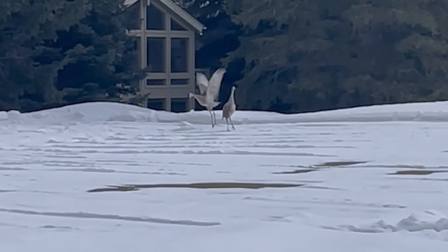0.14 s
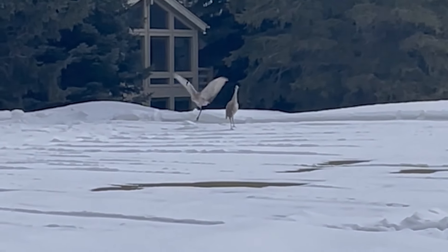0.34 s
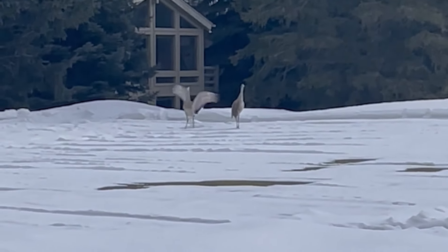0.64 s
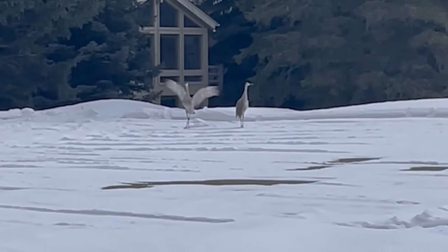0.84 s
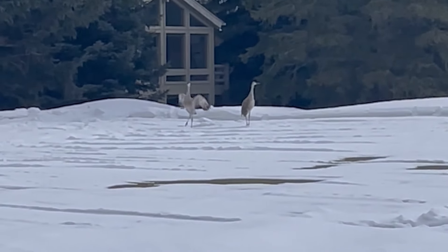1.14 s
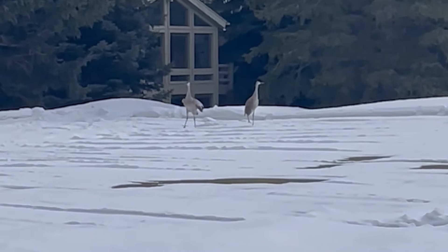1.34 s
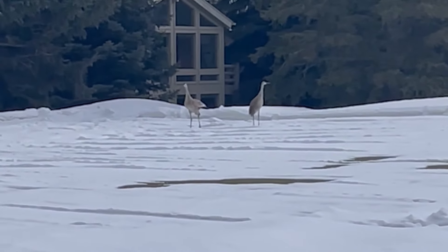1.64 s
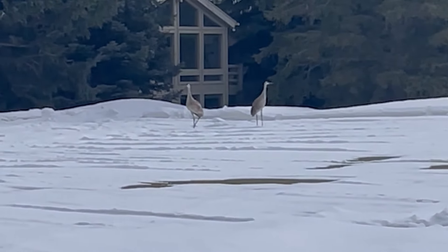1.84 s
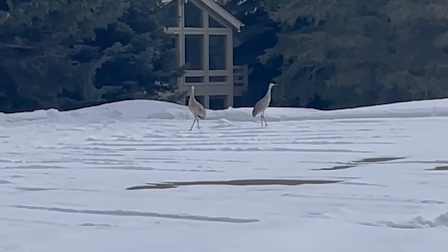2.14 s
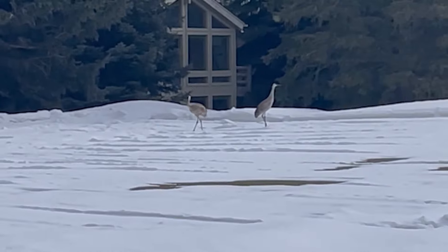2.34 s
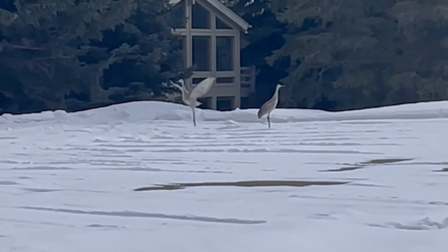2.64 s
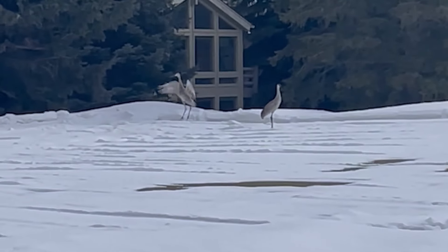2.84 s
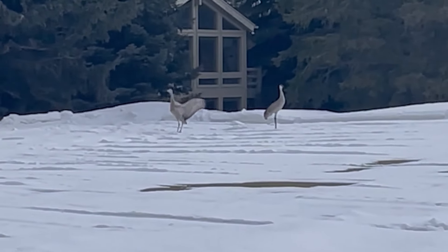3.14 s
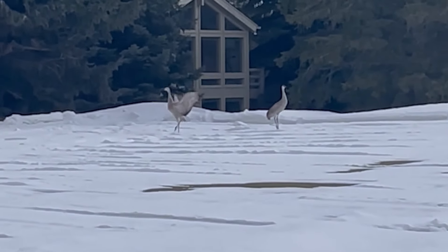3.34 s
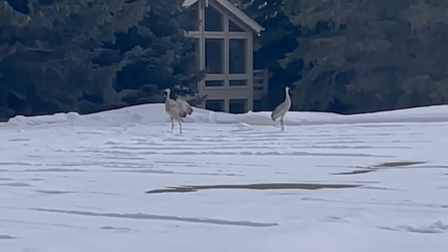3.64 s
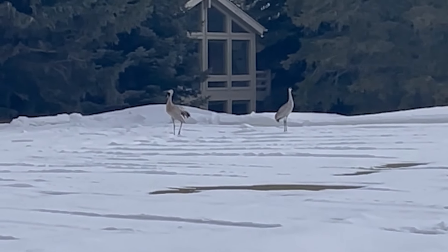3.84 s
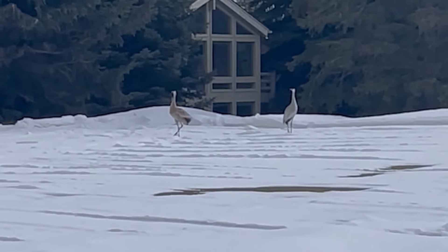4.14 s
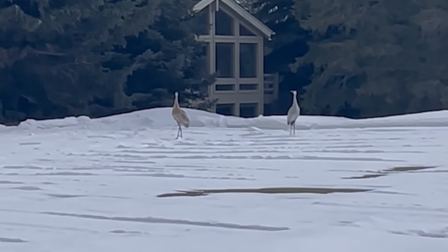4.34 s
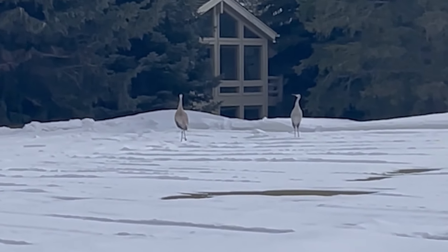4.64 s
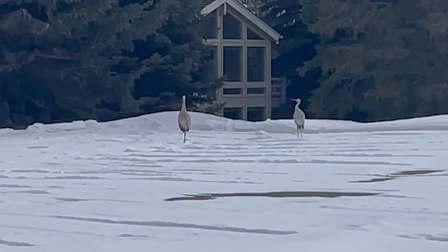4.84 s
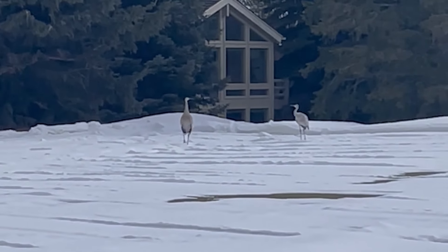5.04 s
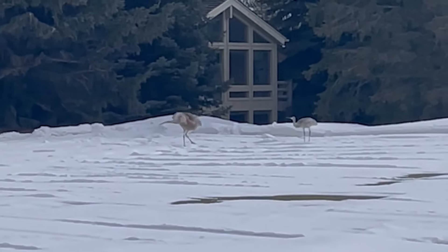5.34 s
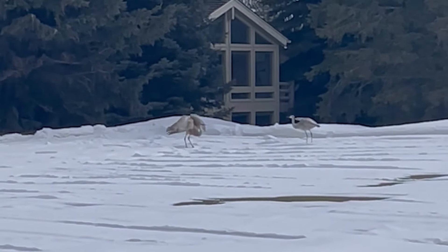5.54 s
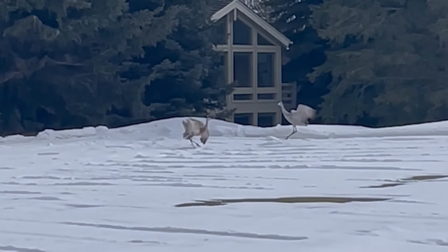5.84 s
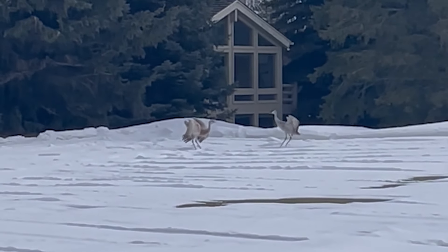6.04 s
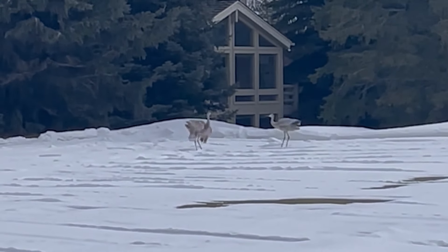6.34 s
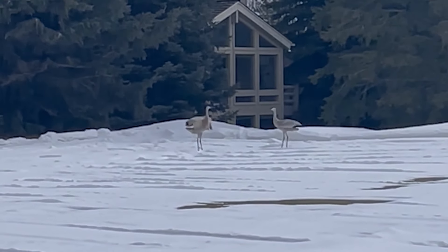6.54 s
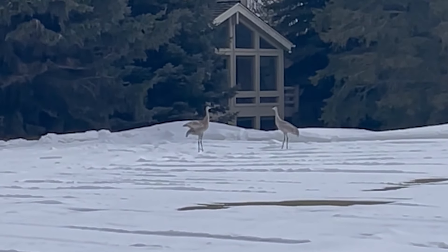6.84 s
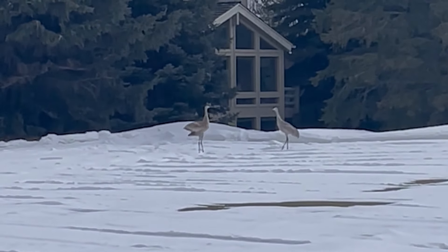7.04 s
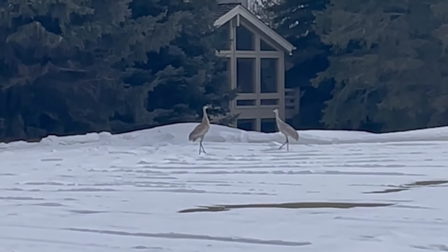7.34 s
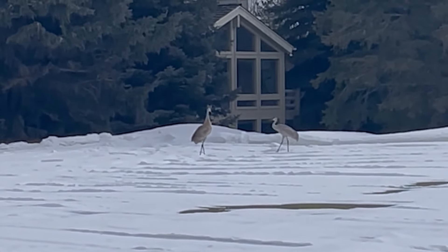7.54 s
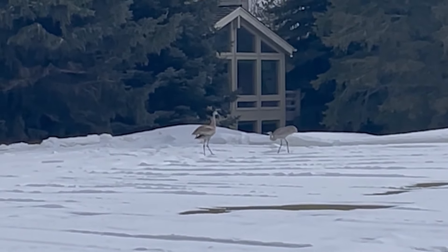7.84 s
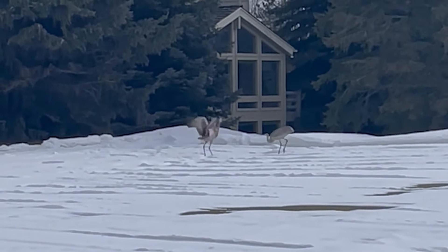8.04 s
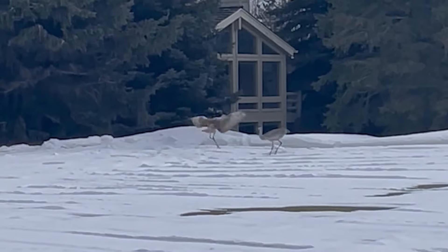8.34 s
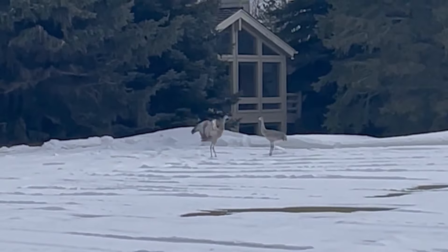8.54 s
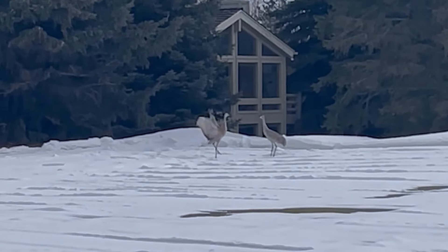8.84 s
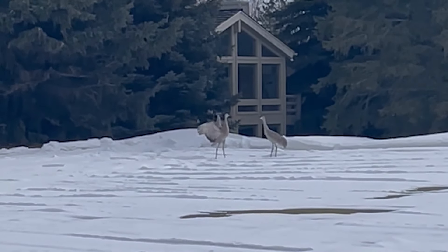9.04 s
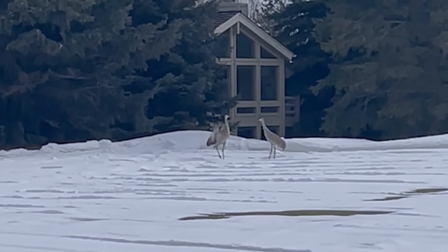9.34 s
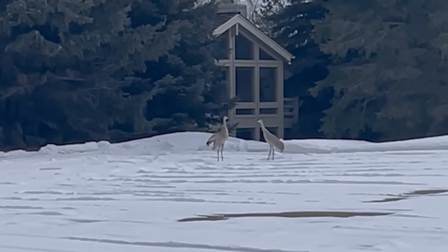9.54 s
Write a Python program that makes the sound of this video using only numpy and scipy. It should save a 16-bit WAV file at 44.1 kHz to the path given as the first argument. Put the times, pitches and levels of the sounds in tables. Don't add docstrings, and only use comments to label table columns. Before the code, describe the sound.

A wide, quiet snowy field with soft far road hiss and low rumble throughout. At 0 s a crane duet is already rattling, a higher clean voice over a lower, rougher one, ending by 0.4 s with an echo from the house and trees. Tiny gliding bird notes appear near 1.5 and 2.7 s, with a soft thud at 2.35. A short toot at 2.8 opens the second, loudest duet, rolling to 3.6 s. A low idling hum swells around 3.5 to 4, and a far engine revs up, pulling away until 4.9. A thud lands at 4.8; faint steady chips run from 4.9 to about 8.5. The engine drones from 5 s to the end. The third duet runs 5.6 to 6.4, with dull thuds at 5.6, 6.2 and 6.9. Faint falling peeps come from 6.8 to 7.8. The last, slightly softer duet rattles from 8.4 to 9.1, then its tail fades into road and drone.

```python
import sys
import numpy as np
from scipy import signal
from scipy.fft import rfft, irfft, next_fast_len
from scipy.io import wavfile
from scipy.ndimage import uniform_filter1d

SR = 44100
rng = np.random.default_rng(int(sys.argv[2]) if len(sys.argv) > 2 else 0)


def volts(x):
    e = np.asarray(x, float) / 20
    return 10 ** e


def int16_out(signal):
    q = np.round(np.clip(np.atleast_2d(signal).T, -1, 1) * 32767)
    wavfile.write(sys.argv[1], SR, q.astype(np.int16))


N = 427759
TIME = np.arange(N) / SR

# time in seconds, hiss level in dB.
ROAD_HISS = [(0.0, -56), (1.1, -58.5), (2.4, -58), (2.9, -55.5), (3.6, -57), (4.1, -54.5), (4.9, -57.5),
             (5.7, -55.5), (6.4, -54.5), (7.2, -57.5), (7.7, -55), (8.9, -55), (9.7, -57)]
# frequency in Hz, level in dB per Hz.
ROAD_TONE = [(15, -51), (25, 6), (79, 0), (134, -9), (473, -10.5), (539, -11.5), (887, -6), (1420, -15.5),
             (2000, -24.5), (3050, -30.5), (5870, -49.5), (6690, -51.5), (7240, -49), (10200, -58),
             (12000, -61), (12600, -83)]
# frequency in Hz, side level minus middle level in dB.
ROAD_SIDE = [(60, -33), (110, -33), (200, -14.5), (360, -14.5), (650, -12.5), (1180, -11), (2140, -10.5),
             (3880, -12), (7050, -10), (12800, -1)]
# time in seconds, hum level in dB.
IDLER_HUM = [(0, -59.5), (1.1, -63), (1.5, -55.5), (2.3, -54.5), (2.95, -51.5), (3.2, -49), (3.5, -43.5),
             (3.7, -49), (3.83, -43), (4.0, -50), (4.6, -61), (5.7, -60), (7, -62), (7.4, -61.5),
             (9.7, -72)]

# time in seconds, peak level in dB, pitch in Hz.
HIGH_HONKS = [(0.012, -17.5, 999), (0.062, -18.5, 984), (0.11, -19.5, 969), (0.156, -25, 848),
              (2.939, -17, 967), (3.006, -16.5, 1000), (3.065, -16, 1016), (3.114, -17, 974),
              (3.164, -16.5, 981), (3.209, -19, 948), (3.255, -20.5, 839), (5.775, -19, 983),
              (5.843, -18.5, 1007), (5.902, -17.5, 975), (5.951, -17.5, 1000), (6.002, -17.5, 970),
              (6.053, -18.5, 964), (6.101, -22, 985), (8.551, -20.5, 969), (8.617, -21, 996),
              (8.673, -20, 932), (8.727, -18.5, 992), (8.778, -24, 975), (8.826, -21.5, 976),
              (8.869, -23.5, 910)]
# time in seconds,
# peak level in dB, pitch in Hz.
LOW_HONKS = [(0.024, -23, 827), (0.083, -21, 806), (0.146, -26, 806), (0.201, -25, 744), (0.256, -24, 760),
             (0.302, -24.5, 699), (3.109, -20.5, 763), (3.189, -23, 753), (3.267, -31, 800),
             (3.321, -23, 746), (3.377, -24, 773), (3.426, -21.5, 743), (3.475, -23.5, 663.4),
             (5.885, -39, 660), (5.92, -23, 749), (5.997, -22.5, 769), (6.069, -21, 745),
             (6.13, -22.5, 777), (6.187, -23.5, 757), (6.242, -23.5, 747), (6.293, -25.5, 763),
             (8.66, -32, 840), (8.704, -21, 761), (8.78, -20.5, 748), (8.848, -21.5, 776),
             (8.909, -23.5, 752), (8.966, -25, 738), (9.016, -26, 769),
             (0.347, -34, 661),
    (3.515, -26, 742),
    (3.555, -33, 667),
    (6.336, -29, 750),
    (6.376, -34.5, 707),
    (9.057, -26.5, 728),
]
# frequency in Hz, level in dB.
HIGH_THROAT = [(550, -17), (780, -0.5), (1020, 0), (1400, -12.5), (2050, -9.5), (2500, -24.5), (3100, -18),
               (4300, -19.5), (5300, -25), (6600, -24.5), (8400, -30.5), (9800, -38.5), (12100, -37.5),
               (13800, -62)]
# frequency in Hz, level in dB.
LOW_THROAT = [(430, -13), (600, -0.5), (780, -0.5), (1050, 5.5), (1300, -8), (1850, -3), (2400, -15),
              (3000, -11.5), (4600, -19), (5600, -23), (8070, -28), (9700, -41), (11500, -40), (13800, -62)]
HIGH_BRIGHT_DB = [-3, 0.16, -2.27, -3]
LOW_BRIGHT_DB = [2.2, 0.14, 0.41, 0.13]
# start in seconds, end in seconds,
# frequency cancelled by the bounce off the snow in Hz, depth of that from 0 to 1, house echo in dB.
DUETS = [
    (0, 2.2, 3670, 0.5, -10.5),
    (2.6, 4.1, 3270, 0.91, -7.5),
    (5.5, 6.9, 3830, 0.24, -13.5),
    (8.3, 9.6, 3660, 0.65, -13.5),
]

# start in seconds, length in seconds, from Hz, to Hz, level in dB.
SLIDES = [
    (1.53, 0.056, 5900, 4400, -71),
    (1.572, .043, 4350, 4850, -72),
    (1.64, .03, 5500, 4400, -72),
    (2.653, 0.063, 5400, 4250, -73),
    (2.715, .025, 4700, 5500, -75),
    (2.752, .058, 5800, 3800, -75),
]
# time in seconds, peak level in dB, pitch in Hz.
KNOCKS = [
    (2.351, -44, 64.6),
    (4.782, -36.5, 72.7),
    (5.6, -53, 61.7),
    (6.2, -39, 66),
    (6.93, -42, 63),
]
# start in seconds, length in seconds, pitch in Hz, level in dB.
TOOTS = [
    (2.81, .052, 612, -36),
    (5.635, 0.053, 655, -34),
    (5.8, 0.041, 561, -32.5),
    (8.42, 0.045, 624, -39.5),
]
# start in seconds, length in seconds, pitch in Hz, level in dB.
CROAKS = [
    (2.98, 0.029, 530, -44.5),
    (3.012, 0.016, 587, -29.5),
    (8.58, .019, 520, -39.5),
    (8.6, 0.026, 571, -33),
]
# frequency in Hz, level in dB.
TOOT_THROAT = [(290, -42), (500, -14), (839, -12.5), (1320, 0), (1590, -8), (1780, -5), (1980, -3.5),
               (2460, -20), (3330, -12.5), (6310, -40), (7740, -37), (9630, -55), (13000, -78)]
# time in seconds, firing rate in Hz, level in dB, exhaust facing us in dB.
ENGINE = [
    [(3.7, 58, -70, -28), (3.856, 70, -56.5, 0), (4.064, 107, -47.5, -1.5), (4.3, 108, -57, -3.5),
     (4.55, 102, -57, -9), (4.9, 100, -72, 1)],
    [(5.0, 100.2, -76, 11), (5.3, 100.2, -59.5, 1), (5.8, 101, -58.5, 0.5), (6.3, 101.5, -50.5, -2.5),
     (6.76, 101.6, -53.5, -2.5), (7.05, 101.5, -59, -14), (7.4, 101.5, -60, 5.5), (7.8, 101.9, -53, -1),
     (8.1, 102.3, -53, 0.5), (8.4, 103.5, -53.5, 8.5), (9.08, 106.8, -50, -1), (9.7, 107.3, -56, 2)],
]
# time in seconds, peak level in dB, pitch in Hz.
PEEPS = [
    (6.8379, -70, 3740),
    (6.924, -64, 3500),
    (7.165, -67, 3700),
    (7.2534, -63, 3780),
    (7.4748, -63, 3730),
    (7.6002, -79, 3730),
    (7.7069, -67, 3810),
    (7.8235, -74, 3870),
]

# frequency in Hz, lead of the left in radians.
PORT_PHASE = [(100, 0), (1200, -.2), (2600, .7), (4400, .7), (5200, .1), (6900, 2.6), (12900, 8.1)]
# frequency in Hz, left minus right in dB.
PORT_DB = [(110, 0), (200, .4), (360, .9), (650, 1.8), (1180, 1), (2140, .4), (3880, 0)]


def on_log(table, hz):
    f, v = np.transpose(table)
    return np.interp(np.log(np.maximum(hz, 1)), np.log(np.maximum(f, 1)), v)


def shaped(x, gain):
    size = next_fast_len(x.shape[-1] + 4096)
    hz = np.arange(size // 2 + 1) * SR / size
    return irfft(rfft(x, size) * gain(hz), size)[..., :x.shape[-1]]


def unit(x):
    return x / np.sqrt(np.mean(x ** 2))


def walk(rate, size=N):
    k = max(int(SR / rate), 1)
    steps = np.repeat(rng.standard_normal(size // k + 1), k)
    return 1.342 * uniform_filter1d(uniform_filter1d(steps, k), k)[:size]


def add(out, s, sound):
    i = max(int(s * SR), 0)
    out[i:i + len(sound)] += sound[:N - i]


def phase(hz):
    return 2 * np.pi * np.cumsum(hz) / SR


def ports(x):
    half = lambda f: volts(on_log(PORT_DB, f) / 2) * np.exp(.5j * on_log(PORT_PHASE, f))
    return np.array([shaped(x, half), shaped(x, lambda f: 1 / half(f))])


def road():
    hiss_db = np.interp(TIME, *np.transpose(ROAD_HISS))
    hum_db = np.interp(TIME, *np.transpose(IDLER_HUM))
    rumble_db = -56 + .25 * (hum_db - hum_db.mean()) + 1.3 * walk(2.66)
    noise = 0
    for hz in 40 * 2 ** np.arange(9):
        octave = lambda f: np.cos(np.pi / 2 * np.clip(np.log2((f + 1) / hz), -1, 1))
        band = lambda f: volts(on_log(ROAD_TONE, f)) * octave(f)
        if hz < 100:
            db = rumble_db + 24
        else:
            db = (hiss_db + 58) * min(400 / hz, 1) ** .5 - 28.5
        noise = noise + volts(db + 0.41 * walk(5)) * shaped(rng.standard_normal((2, N)), band)
    side = shaped(noise[1], lambda f: volts(on_log(ROAD_SIDE, f) - 3.0))
    hum = volts(hum_db + 3.5 + 2.1 * walk(7)) * np.sin(phase(63 * (1 + 0.03 * walk(3))))
    return ports(noise[0]) + side * np.array([[1], [-1]]) + hum


def voice(hz, throat, rough, tilt_db, breath_db=-60, effort=1, bite=0, body=1):
    size = len(hz)
    hz = hz * (1 + 0.21 * rough * walk(700, size))
    turn = phase(hz)
    colour = lambda f: volts(on_log(throat, f) + tilt_db * np.log2(np.maximum(f, 300) / hz.mean()))
    lag_s, shift = 0.000517 + 0.000432 * rng.random(), rng.random()
    ripple = lambda f: 1 + 2.1 * np.cos(2 * np.pi * (f * lag_s + shift))
    hiss = lambda f: colour(f) * ripple(f) / np.hypot(1, (1500 / (f + 1)) ** 2)
    air = shaped(rng.standard_normal(size), hiss)
    out = volts(breath_db) * air * effort ** (0.61 + 2 * bite)
    for k in range(1, int(15000 / hz.mean())):
        shake = 1 + rough * min(0.51 * k - .35, 4) * walk(1200, size)
        shake = shake / np.hypot(1, rough * min(0.2 * k - .35, 4))
        strength = body if k == 1 else effort ** (1 + bite * min(k - 1, 5))
        out = out + colour(k * hz) * shake * strength * np.sin(k * turn + k * k)
    return out


def rattle(honks, bright_db, last_s, shorten, throat, sag, rough, breath_db, rise, fall, tail_db, turn_at,
           lead_db, bite, swell_at):
    out = np.zeros(N)
    times = np.array(honks)[:, 0]
    duets = np.searchsorted(np.array(DUETS)[:, 0], times) - 1
    for (s, db, hz), duet in zip(honks, duets):
        length = last_s + shorten * (times[duets == duet].max() - s)
        u = np.arange(-.3, 1.3, 1 / (SR * np.clip(length, .008, .05)))
        along = np.clip(u, 0, 1)
        head = np.sin(np.pi / 2 * np.clip(u / rise, 0, 1))
        head = head * np.exp(-(np.maximum(u - rise, 0) / fall) ** 2)
        tail = volts(tail_db + 2.0 * rng.standard_normal()) * np.exp(-((u - turn_at) / .25) ** 4)
        lead = volts(lead_db + .8 * rng.standard_normal()) * np.exp(-((u + 0.22) / 0.063) ** 4)
        swell = np.exp(-np.abs((u - swell_at) / np.where(u < swell_at, .17, .3)) ** 2.0)
        body = 0.82 * swell + volts(-4.5) * (tail + lead)
        honk = voice(hz * (1.03 - sag * along), throat, rough * (0.51 + along), bright_db[duet], breath_db,
                     head + tail + lead, bite, body)
        peak = np.sqrt(np.max(uniform_filter1d(honk ** 2, size=150)) * 2)
        add(out, s - .3 * length, volts(db) * honk / peak)
    return out


def high_rattle():
    return rattle(HIGH_HONKS, HIGH_BRIGHT_DB, .0205, .002, HIGH_THROAT, sag=0.117, rough=0.22, breath_db=9.0,
                  rise=0.14, fall=0.5, tail_db=-13.5, turn_at=0.95, lead_db=-12, bite=0.22, swell_at=0.26)


def low_rattle():
    return rattle(LOW_HONKS, LOW_BRIGHT_DB, .0165, .0161, LOW_THROAT, sag=0.1692, rough=0.295,
                  breath_db=10.0, rise=0.088, fall=.33, tail_db=-5.5, turn_at=0.72, lead_db=-20, bite=.3,
                  swell_at=0.19)


def snow_and_house(x, db):
    out = np.zeros(N)
    delay_s = .108
    for start, end, hz, depth, echo_db in DUETS:
        bays = lambda f: 1 + 0.49 * np.exp(-((f - 3150) / 400) ** 2)
        surface = lambda f: bays(f) * f / np.hypot(f, 700) / np.hypot(1, (f / 4000) ** 2)
        slap = lambda f: volts(db + echo_db) * surface(f) * np.exp(-2j * np.pi * f * delay_s)
        snow = lambda f: 1 - min(depth, 1) * np.exp(-((f - hz) / 450) ** 2)
        part = x[int(start * SR):int(end * SR)]
        add(out, start, shaped(part, lambda f: snow(f) + slap(f)))
    return out


def trees(x):
    t = np.arange(SR) / SR
    noise = rng.standard_normal((2, SR))
    noise = noise[0] + 0.31 * noise[1] * np.array([[1], [-1]])
    noise = shaped(noise, lambda f: f / np.hypot(f, 800))
    dull = shaped(noise, lambda f: 1 / np.hypot(1, (f / 2500) ** 3)) * volts(-60 * t / 1)
    bright = volts(11) * shaped(noise, lambda f: 1 / np.hypot(1, (f / 5000) ** 5)) * volts(-60 * t / 0.8)
    airy = volts(14) * shaped(noise, lambda f: np.exp(-((f - 10300) / 1700) ** 2)) * volts(-60 * t / 0.48)
    scatter = (dull + bright + airy) * np.clip(t / 0.047, .05, 1)
    scatter = scatter / np.sqrt(np.sum(scatter[0] ** 2))
    return ports(x) + volts(-19) * signal.fftconvolve(x[None], scatter, axes=1)[:, :N]


def whistle(hz, db):
    return volts(db + 2.3 * walk(120, len(hz))) * np.sqrt(2) * np.sin(phase(hz))


def slides():
    out = np.zeros(N)
    for s, length, from_hz, to_hz, db in SLIDES:
        u = np.arange(0, 1, 1 / (SR * length))
        glide = to_hz + (from_hz - to_hz) * (1 - u) ** 1.3
        glide = glide * (1 + 0.013 * walk(290, len(u)))
        note = whistle(glide, db - 4 + 3 * walk(200, len(u)))
        add(out, s, note * np.sin(np.pi * u) ** .6)
    return out


def knocks():
    out, t = np.zeros(N), np.arange(0, .15, 1 / SR)
    for s, db, hz in KNOCKS:
        turn = phase(hz + 420 * np.exp(-t / 0.0034))
        add(out, s, volts(db) * np.sin(turn) * np.clip(t / 0.00089, 0, 1) ** 2 * np.exp(-t / 0.028))
    return out


def toots(rows, rough):
    out = np.zeros(N)
    peak_at = 0.88
    for s, length, hz, db in rows:
        u = np.arange(0, 1, 1 / (SR * length))
        swell_db = -7 * np.clip(1 - u / peak_at, 0, 1)
        drop_db = -11 * np.clip((u - peak_at) / (1 - peak_at), 0, 1)
        edge = np.clip(np.minimum(u / .27, (1 - u) * length / 0.0052), 0, 1)
        scoop = 1 - .11 * np.exp(-u / .187)
        call = unit(voice(hz * scoop, TOOT_THROAT, rough, tilt_db=0.5))
        add(out, s, edge * volts(db + swell_db + drop_db) * call)
    return out


def engine(hz, db, facing_db, upper_db):
    size = len(hz)
    turn = phase(hz * (1 + 0.0031 * walk(12, size)))
    fourth_db = db - 6 + upper_db + 0.28 * facing_db + 2.6 * walk(1.93, size)
    partials = [(1, db), (2, db + facing_db), (4, fourth_db), (2.8, db - 19),
                (5, db - 19 + .3 * facing_db), (5.6, db - 11.5)]
    out = 0
    for k, level_db in partials:
        waver_db = 0.55 * walk(11, size) + 1.2 * walk(3.76, size)
        out = out + np.sqrt(2) * volts(level_db + waver_db) * np.sin(k * turn)
    return out


def engine_runs():
    out = np.zeros(N)
    for rows, upper_db in zip(ENGINE, (-7.5, 0)):
        s, *columns = np.transpose(rows)
        t = np.arange(s[0], s[-1], 1 / SR)
        edge = np.clip(np.minimum(t - t[0], t[-1] - t) / 0.0045, 0, 1)
        hz, db, facing_db = (np.interp(t, s, column) for column in columns)
        add(out, s[0], edge * engine(hz, db, facing_db, upper_db))
    return out


def chips(count, db):
    out, t = np.zeros(N), np.arange(0, .04, 1 / SR)
    start_s, every_s = 4.888, .1397
    hz = 2540 - 1050000.0 * np.where(t < .024, 1, .5) * (t - .024) ** 2
    for k, scatter_db in enumerate(1.9 * rng.standard_normal(count)):
        note = whistle(hz, db + scatter_db + .12 * k) * np.hanning(len(t)) ** 0.33
        add(out, start_s - .01 + k * every_s, note)
    return out


def peeps():
    out, t = np.zeros(N), np.arange(0, .06, 1 / SR)
    for s, db, hz in PEEPS:
        add(out, s - .01, whistle(hz + 200 - 7000 * t, db - 11) * np.hanning(len(t)))
    return out


def scene():
    high = high_rattle() + toots(TOOTS, rough=0.07)
    low = low_rattle() + volts(5) * toots(CROAKS, rough=0.31)
    cranes = snow_and_house(high, db=-3) + snow_and_house(low, db=-0.3)
    birds = cranes + slides() + chips(count=27, db=-67.5) + peeps()
    return trees(birds) + engine_runs() + road() + knocks()


def low_pass(x):
    return signal.sosfilt(signal.butter(12, 15900, fs=SR, output="sos"), x)


def record(dry):
    notch = lambda f: 1 - 0.75 * np.exp(-((f - 8240) / 620) ** 2)
    colour = lambda f: notch(f) / np.hypot(1, (44 / (f + 1)) ** 4)
    rounded = .45 * np.tanh(shaped(dry, colour) / .45)
    return low_pass(rounded)


dry = scene()
out = record(dry)
int16_out(out)
```